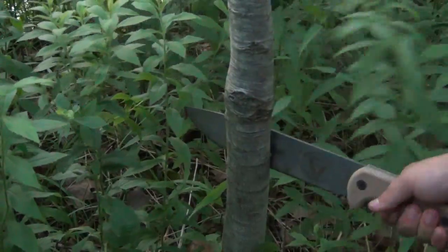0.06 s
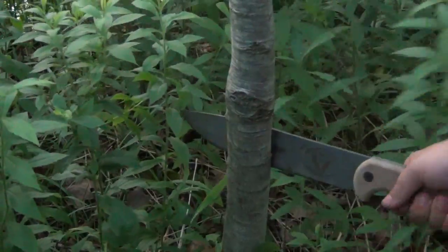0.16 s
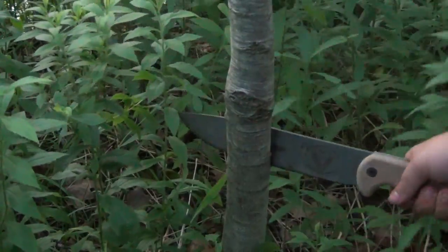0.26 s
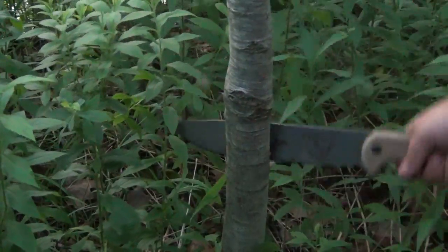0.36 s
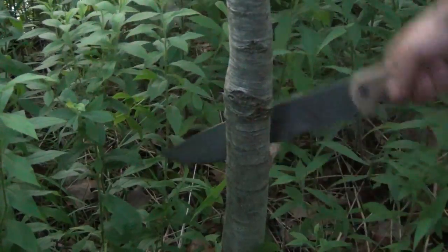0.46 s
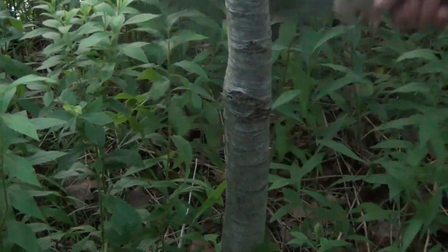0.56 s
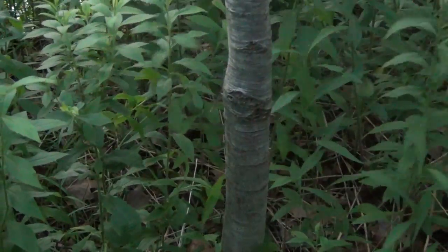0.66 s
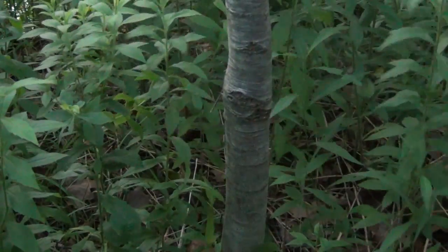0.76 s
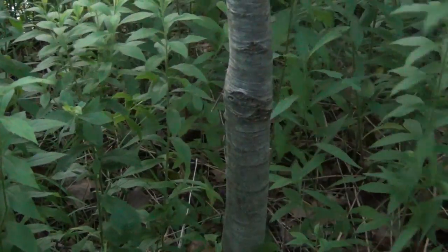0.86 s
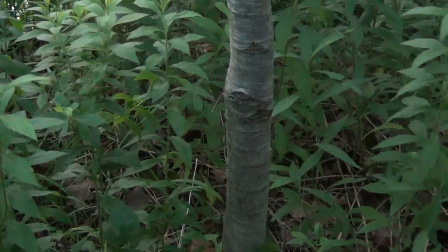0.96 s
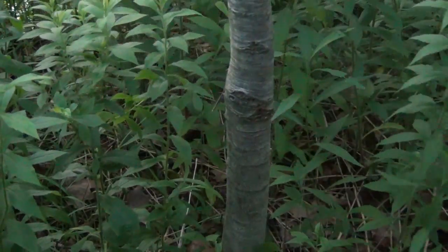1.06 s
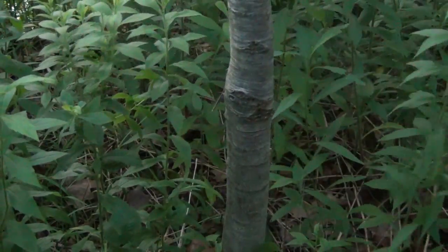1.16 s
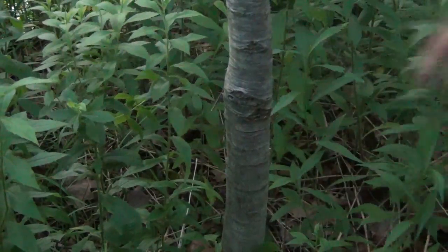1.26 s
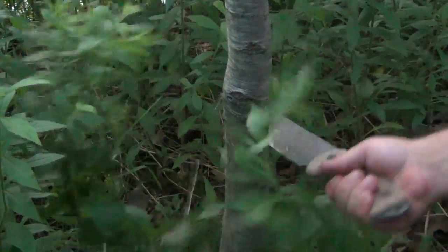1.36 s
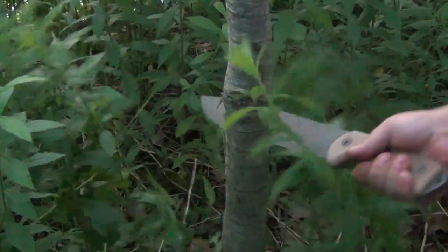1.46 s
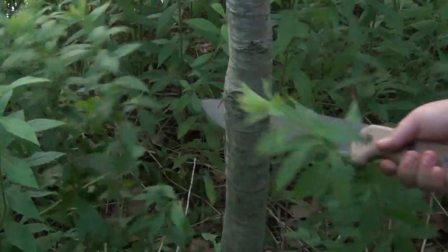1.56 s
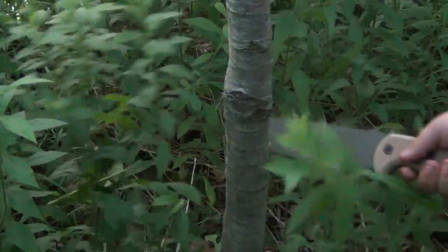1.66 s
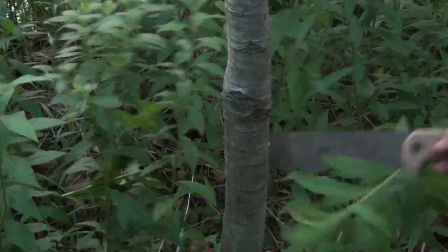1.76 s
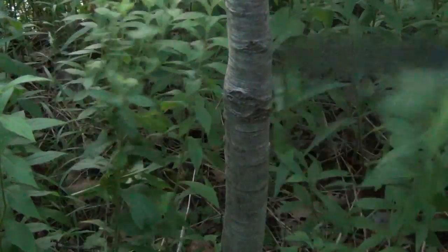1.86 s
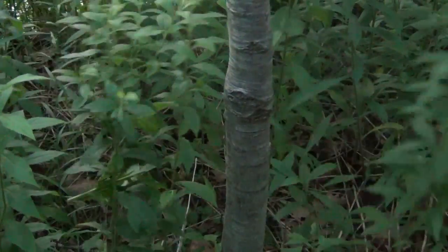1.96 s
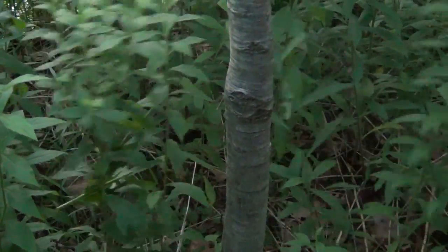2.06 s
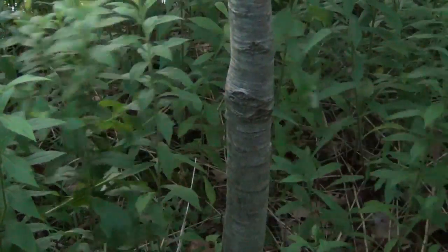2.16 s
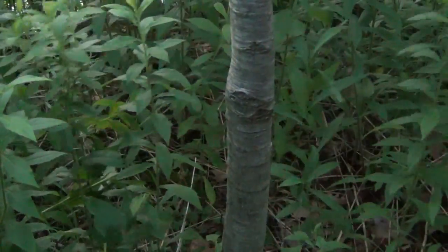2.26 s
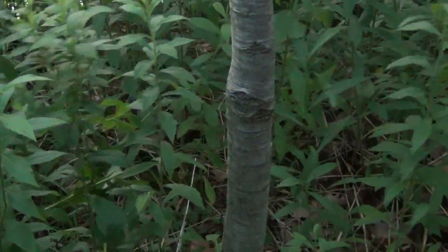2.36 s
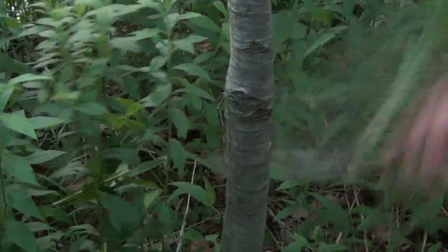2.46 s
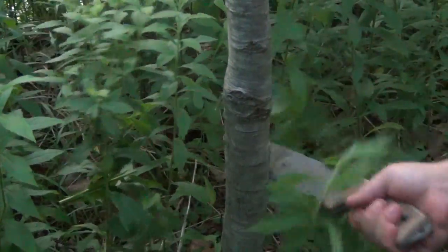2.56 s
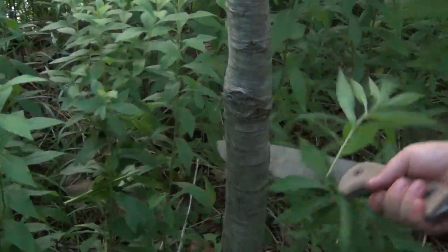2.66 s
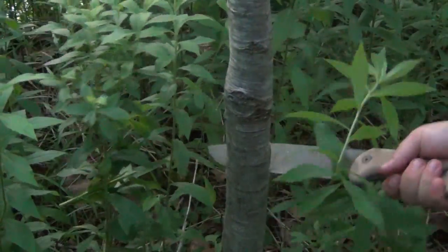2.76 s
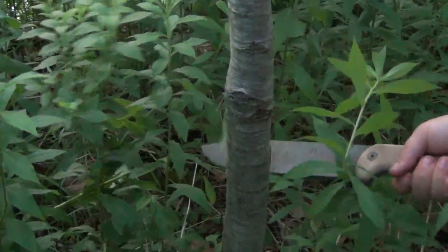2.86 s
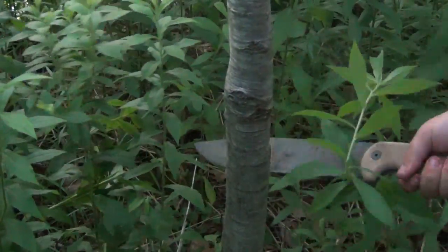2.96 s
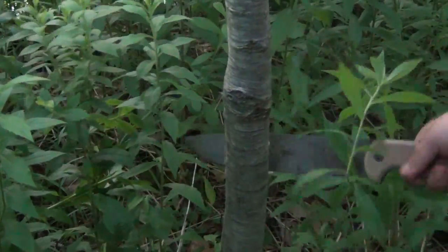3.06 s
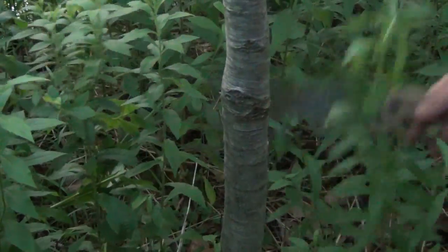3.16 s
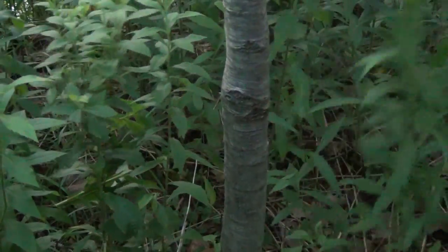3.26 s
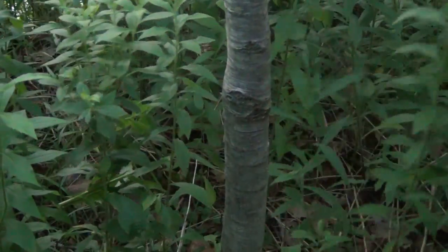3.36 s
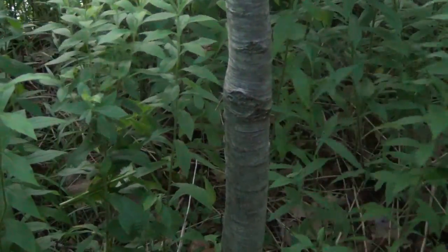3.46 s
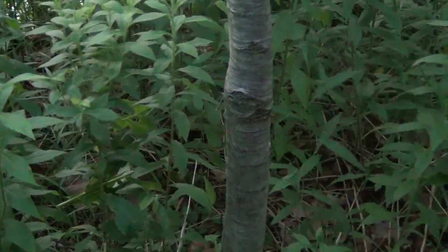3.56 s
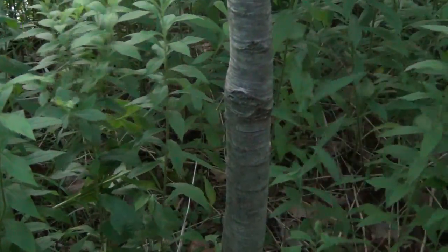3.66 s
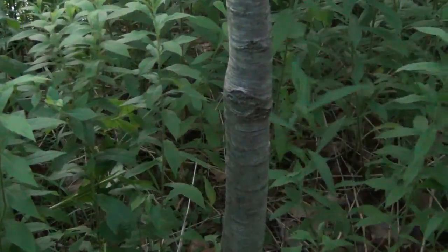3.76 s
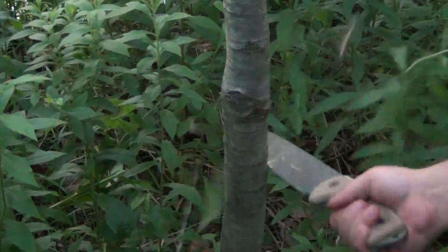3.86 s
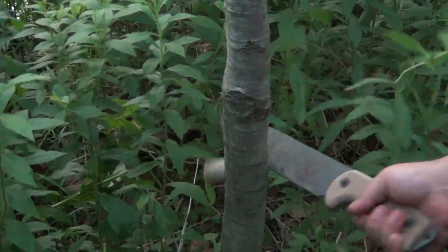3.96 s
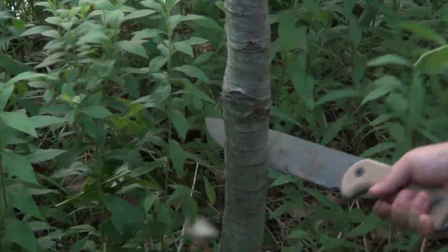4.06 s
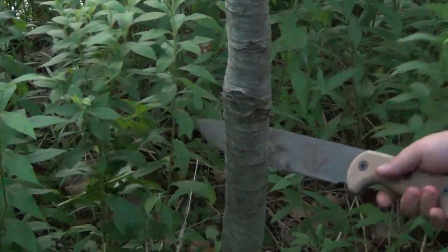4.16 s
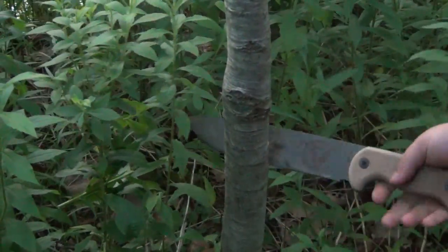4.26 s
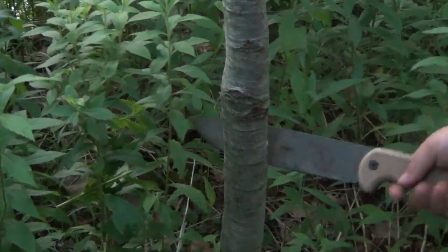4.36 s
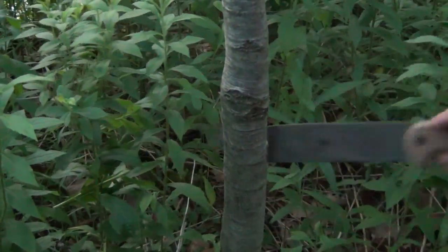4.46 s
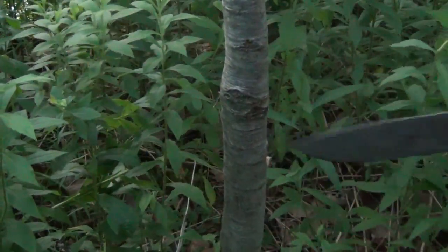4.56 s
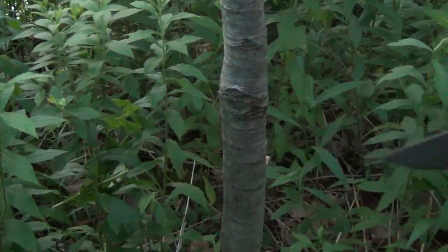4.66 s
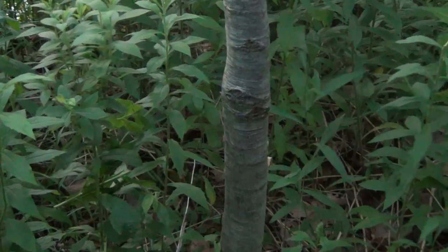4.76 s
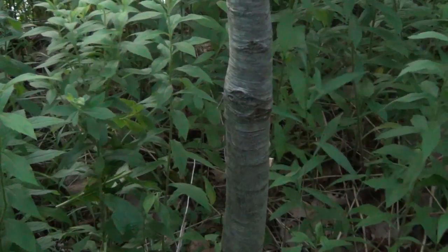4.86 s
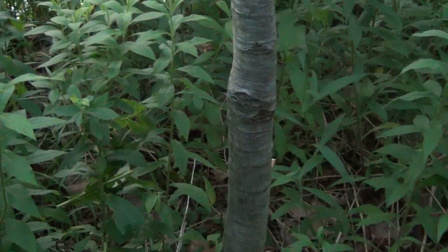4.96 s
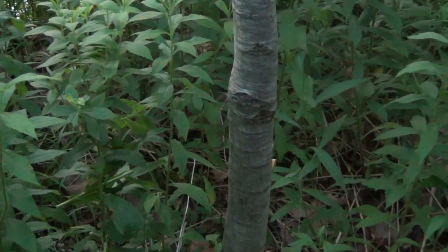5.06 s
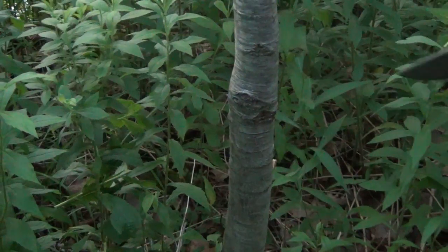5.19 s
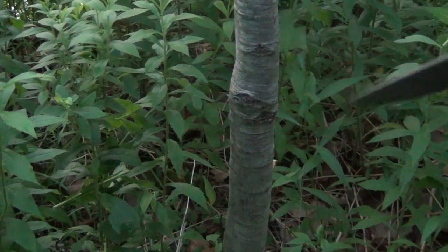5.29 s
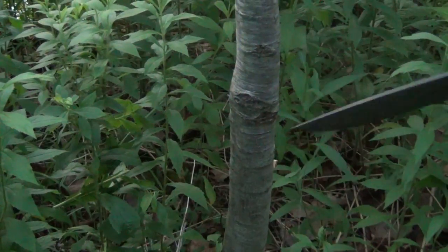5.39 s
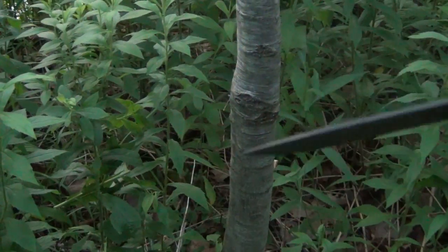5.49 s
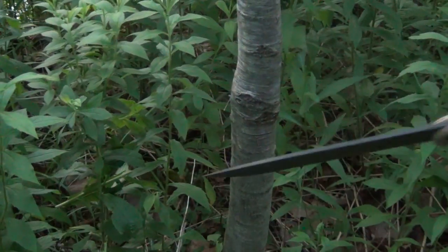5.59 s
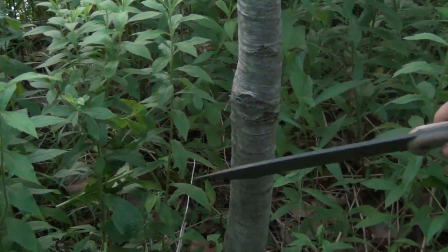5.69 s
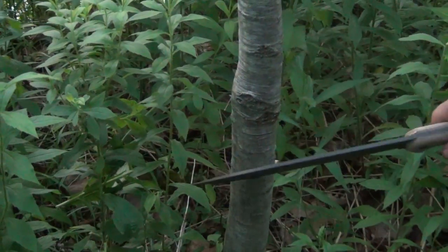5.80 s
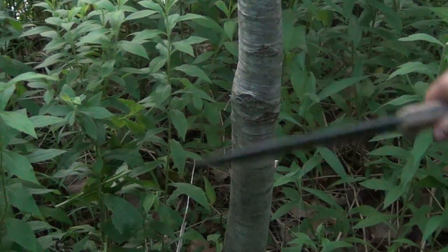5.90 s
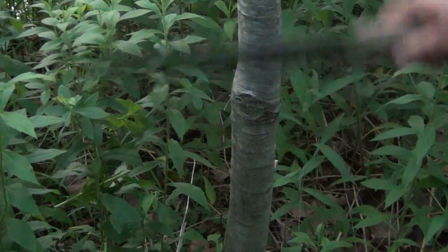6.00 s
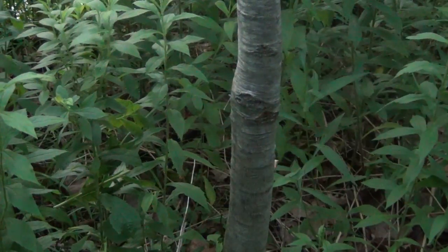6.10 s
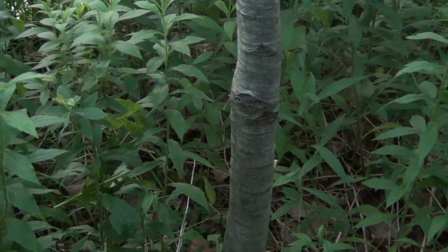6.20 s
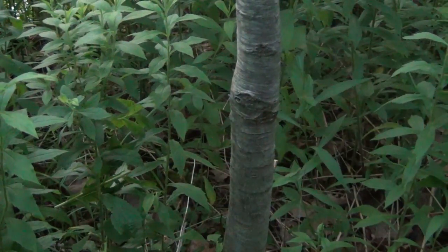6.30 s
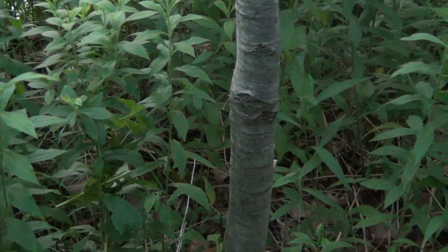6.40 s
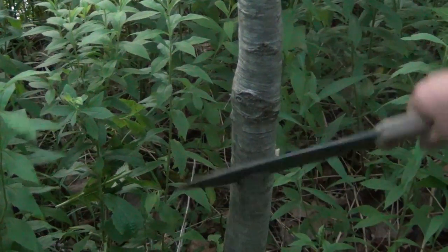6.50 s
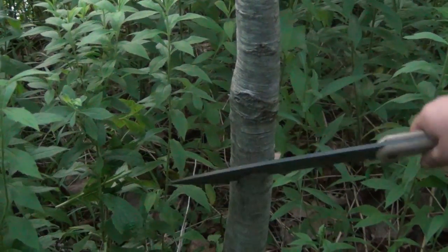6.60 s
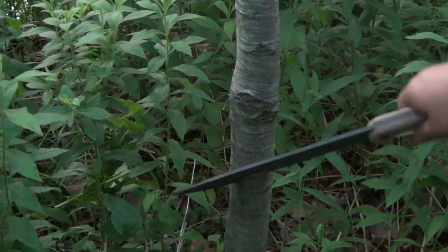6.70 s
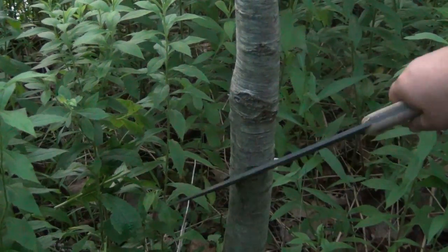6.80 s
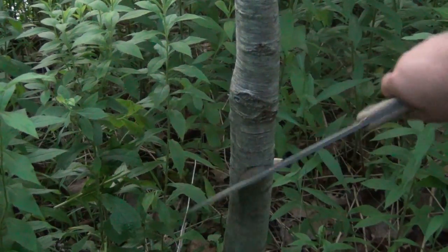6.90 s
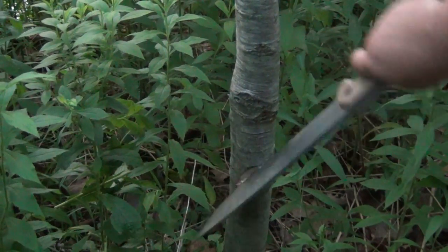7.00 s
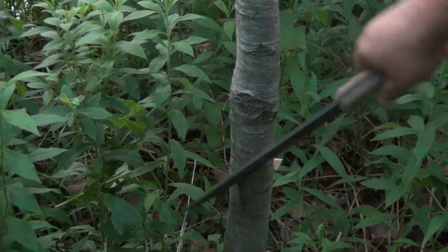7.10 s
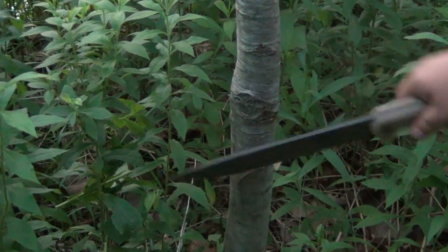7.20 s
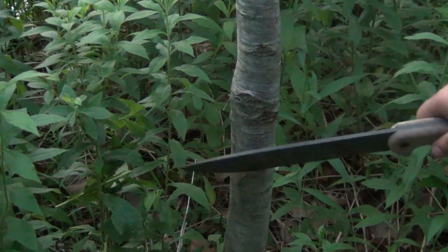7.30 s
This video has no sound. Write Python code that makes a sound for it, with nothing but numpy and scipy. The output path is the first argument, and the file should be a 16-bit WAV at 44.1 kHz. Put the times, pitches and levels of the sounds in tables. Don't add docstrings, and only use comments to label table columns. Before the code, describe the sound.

In leafy woodland, a long knife is worked loose from a thin trunk with crackling snaps and a brief steel ring. Three hard, spaced chops follow, each a woody knock with a low thud and a shower of leaves, then a light bite and another solid blow. Small birds whistle nearby and farther off over faint traffic hum. Close stereo camera microphone.

```python
import sys
import numpy as np
from scipy import signal
from scipy.fft import rfft, irfft, next_fast_len
from scipy.io import wavfile
from scipy.ndimage import uniform_filter1d, map_coordinates

SR = 44100
rng = np.random.default_rng(int(sys.argv[2]) if len(sys.argv) > 2 else 0)


def file_out(sig):
    cols = np.atleast_2d(sig).T
    lim = np.clip(cols, -1, 1)
    pcm = np.round(lim * 32767).astype(np.int16)
    wavfile.write(sys.argv[1], SR, pcm)


def volts_from_db(level):
    exponent = np.asarray(level, float) / 20
    return 10 ** exponent


N = 323694
CUT_RISE_S = 0.00082


def unit(x):
    return x / np.sqrt(np.mean(x ** 2) + 1e-20)


def along(points, hz):
    f, v = np.transpose(points)
    return np.interp(np.log(hz + 1), np.log(f + 1), v)


def filtered(x, response):
    m = next_fast_len(x.shape[-1] + 4096)
    spectrum = rfft(x, m) * response(np.fft.rfftfreq(m, 1 / SR))
    return irfft(spectrum, m)[..., :x.shape[-1]]


def peak(f, hz, width_hz):
    return 1j * f * width_hz / (hz * hz - f * f + 1j * f * width_hz)


def wobble(rate_hz, size):
    knots = rng.standard_normal(int(size * rate_hz / SR) + 4)
    return map_coordinates(knots, [np.arange(size) * rate_hz / SR])


def add(out, start_s, x):
    seat = out[..., round(start_s * SR):][..., :x.shape[-1]]
    seat += x[..., :seat.shape[-1]]


def pair(size, alike):
    turn = np.arccos(np.clip(alike, 0, 1)) / 2
    mid, side = rng.standard_normal((2, size)) * [[np.cos(turn)], [np.sin(turn)]]
    side = filtered(side, lambda f: peak(f, 4200, 11600) / (1 + (f / 14000) ** 4))
    return np.array([mid + side, mid - side])


def crackle(size, colour, grain_db, alike):
    # mode_hz, width_hz, lift_db
    steel = [(460, 440, -7), (1530, 170, -7), (2080, 100, -7), (2760, 55, -12), (4300, 130, -14),
             (5680, 55, -16), (6730, 110, -3), (7290, 100, 1), (8300, 200, -8), (10200, 150, -11)]
    jumps = volts_from_db(grain_db * (wobble(2500, size) + .6 * wobble(400, size)))
    bumps = rng.standard_normal(40)

    def response(f):
        ripple = volts_from_db(.6 * map_coordinates(bumps, [4 * np.log2(1 + f / 100)]))
        lift = 1 + sum(volts_from_db(db) * np.abs(peak(f, hz, width_hz)) ** 2 for hz, width_hz, db in steel)
        return colour(f) * ripple * lift

    return unit(filtered(jumps * pair(size, alike), response))


def rush(spectrum, patchy_db):
    # hz, left_right_likeness
    likeness = [(30, .6), (60, 0.95), (240, 0.92), (950, 0.881), (3770, 0.62), (15000, 0.57)]
    z = signal.stft(rng.standard_normal((2, N)), nperseg=512)[2]
    field = uniform_filter1d(rng.standard_normal(z.shape[1:]), size=6, axis=0)
    field = uniform_filter1d(field, size=12, axis=1)
    patchy = signal.istft(z * volts_from_db(patchy_db * unit(field)), nperseg=512)[1][:, :N]

    def response(f):
        turn = np.arccos(np.clip(along(likeness, f), -1, 1)) / 2
        return volts_from_db(along(spectrum, f)) * [np.cos(turn), np.sin(turn)]

    mid, side = filtered(patchy, response)
    return unit(np.array([mid + side, mid - side]))


def trees(x):
    # hz, t60_s
    wood = [(500, 0.15), (3000, 0.23), (6000, 0.31), (12000, 0.38)]
    hz, t, z = signal.stft(rng.standard_normal((2, SR // 2)), SR, nperseg=256)
    tail = signal.istft(z * volts_from_db(-60 * t / along(wood, hz)[:, None]), SR, nperseg=256)[1]
    tail = tail / np.linalg.norm(tail[0])
    return signal.fftconvolve(np.pad(x, (300, 0))[None], tail, axes=1)[:, :N]


def background():
    # hz, db_per_hz
    hum = [(12, -41), (20, -19), (42, -1.5), (64, -28), (83, -2.5), (102, 3.5), (129, -1), (225, -3.5),
           (255, -10), (289, -10.5), (400, -20.5), (520, -57), (880, -120)]
    # hz, db_per_hz
    roar = [(180, -41), (300, -14), (328, -13), (455, -5), (573, -6.5), (649, -6.5), (768, -4), (951, -4),
            (1180, -1), (1490, -8), (1690, -10), (1820, -10.5), (2210, -14), (2500, -19.5), (3250, -38),
            (5500, -120)]
    # hz, db_per_hz
    foliage = [(900, -32), (1800, -5), (3000, 2), (5000, -2.5), (8000, -12), (12000, -68)]
    # hz, db_per_hz
    hiss = [(3000, -58), (6000, 3.5), (11000, 0.5), (15500, -5.5), (16500, -25)]
    # time_s, roar_db
    road_curve = [(0, -47.5), (.9, -46), (1.7, -49), (3, -50), (3.85, -45.5), (4.6, -44), (5.5, -42.5),
                  (5.95, -45), (7.34, -46.5)]
    # time_s, level_db
    stir_curve = [(0, -44.5), (.4, -53), (.9, -53.5), (1.3, -57), (1.7, -49), (2.1, -56), (2.5, -57),
                  (3, -50.5), (3.45, -51.5), (3.85, -54), (4.2, -50.5), (4.6, -51), (5, -47), (5.5, -45),
                  (5.95, -53), (6.4, -56.5), (6.8, -46.5), (7.34, -57.5)]
    t = np.arange(N) / SR
    road_db = np.interp(t, *np.transpose(road_curve))
    stir_db = np.interp(t, *np.transpose(stir_curve))
    hum_db = -54.5 + 0.086 * (road_db - road_db.mean()) + 0.87 * t
    hiss_db = -7 + stir_db.mean() + 0.78 * (stir_db - stir_db.mean())
    traffic = volts_from_db(hum_db) * rush(hum, patchy_db=1.9) + volts_from_db(road_db) * rush(roar, patchy_db=1.5)
    leaves = volts_from_db(stir_db - 0.1) * rush(foliage, patchy_db=2.5)
    return traffic + leaves + volts_from_db(hiss_db) * rush(hiss, patchy_db=1.6)


def strokes():
    # start_s, hold_s, t60_s,
    # level_db, brightest_hz
    cut_rows = [(0, 0.0065, 0.31, -33.5, 3700), (.588, 0.054, 0.15, -33.5, 5800),
                (1.375, 0.0022, 0.015, -28, 2000), (1.377, 0.035, 0.02, -19, 6200),
                (1.383, 0.0037, 0.022, -20.5, 7000), (1.545, 0.016, 0.13, -30, 6950),
                (2.572, 0.0034, .028, -15.5, 2760), (2.577, 0.016, 0.055, -20.5, 6370),
                (2.899, 0.00949, 0.077, -47, 8000), (3.226, 0.0067, 0.096, -35.5, 5950),
                (3.886, 0.023, .02, -43.5, 2500), (3.918, 0.021, .03, -30.5, 5215),
                (3.9302, 0.002, 0.039, -13, 4400), (3.938, 0.04, 0.13, -22, 3570),
                (4.298, 0.0055, 0.18, -38, 6060), (5.829, 0.0052, 0.047, -29.5, 7000),
                (6.5916, 0.0014, 0.01, -10.5, 3400), (6.598, 0.0074, 0.37, -29, 3320),
                (0, 0.014, 0.36, -35.5, 160), (1.388, 0.019, 0.041, -22.5, 450),
                (2.579, 0.014, .02, -20.5, 480), (3.907, 0.0089, 0.033, -28, 650)]
    # start_s, stroke_s, level_db, brightest_hz
    rustle_rows = [(0.118, 0.038, -45, 7840), (.956, 0.037, -48, 3520), (1.296, 0.035, -46, 3670),
                   (1.7, 0.034, -49.5, 4300), (1.827, 0.062, -50.5, 4340), (2.163, .03, -52.5, 9000),
                   (2.72, 0.12, -48.5, 5740), (3.365, 0.028, -44, 9000), (4.34, 0.038, -36, 5440),
                   (4.455, 0.075, -47, 9000), (4.631, 0.0468, -43.5, 4640), (5.196, 0.2, -43.5, 2460),
                   (5.768, 0.11, -34, 2290), (6.84, 0.027, -65, 4500), (7, 0.059, -50, 4040)]
    # start_s, stroke_s, level_db, brightest_hz
    scrape_rows = [
        (.455, 0.12, -37, 7500),
        (3.1, 0.061, -42, 7650),
        (3.9031, 0.0162, -22, 4630),
        (7.061, 0.071, -37, 9000),
    ]
    rows = [(s, CUT_RISE_S, hold_s, t60_s, db, hz) for s, hold_s, t60_s, db, hz in cut_rows]
    for s, d, db, hz in rustle_rows:
        rows.append((s, 0.22 * d, (1 - 0.22) * d, 0.033 + 1.96 * d, db, hz))
    for s, d, db, hz in scrape_rows:
        rows.append((s, 0.18 * d, (1 - 0.18) * d, 0.4 * d, db, hz))
    return rows


def brushing():
    # hz, db_per_hz
    leaf = [(120, -10), (200, 6), (448, 3.5), (1530, 8), (2130, 6), (2510, 6), (7410, -1.5), (11500, -0.5),
            (14600, -11), (16000, -58)]
    out = np.zeros((2, N))
    for s, rise_s, hold_s, t60_s, db, hz in strokes():
        t = np.arange(SR // 2 if hold_s + t60_s > .15 else SR // 5) / SR
        stroke = np.minimum(t / rise_s, 1) * volts_from_db(-60 * np.maximum(t - rise_s - hold_s, 0) / t60_s)

        def colour(f):
            leaf_db = along(leaf, f)
            return volts_from_db(leaf_db - 8) + volts_from_db(.4 * leaf_db - 8 * np.log2((f + 50) / hz) ** 2)

        add(out, s, volts_from_db(db) * stroke * crackle(len(t), colour, grain_db=2.5, alike=0.69))
    return out


def ticks():
    # start_s, peak_db
    slips = [(.123, -33), (0.2954, -37), (0.35, -32.5), (0.3656, -41), (.401, -31), (0.452, -23),
             (0.515, -21.5), (.2453, -36), (.3092, -45), (.3292, -41), (0.382, -39), (0.4976, -29),
             (.508, -31), (.523, -26), (.528, -23.5), (.535, -22), (.557, -32), (0.567, -32), (0.583, -36),
             (0.593, -25), (.633, -33), (3.2347, -29), (3.3036, -38), (3.094, -36), (3.1218, -27),
             (3.1257, -27), (3.138, -23.5), (3.181, -37), (4.226, -42), (4.232, -49), (4.303, -26),
             (0.679, -39), (3.079, -35), (3.108, -29.5), (3.3745, -38), (4.1996, -28.5), (4.3418, -26),
             (.143, -36), (.253, -41), (.291, -44), (0.345, -41), (1.767, -38), (6.71, -34), (1.834, -42),
             (7.163, -42), (3.21, -37), (3.402, -42), (4.66, -44), (4.98, -40), (5.026, -42),
             (5.207, -37.5), (5.742, -41), (5.8425, -33), (5.924, -42), (5.933, -45), (5.762, -31),
             (6.965, -38), (7.011, -29), (7.196, -38.5)]
    luck = np.exp(0.16 * np.clip(rng.standard_normal((len(slips), 2)), -2, 2))
    return [(s, db, 3300 * low, 7600 * high, -4.5) for (s, db), (low, high) in zip(slips, luck)]


def snaps():
    # start_s, peak_db, low_hz, high_hz, low_over_high_db
    fibres = [(0.4253, -10.5, 3000, 6700, 1.5), (0.467, -24.5, 3000, 8100, -11),
              (0.4802, -20, 2900, 9100, -5), (0.539, -18.5, 1940, 7740, 4),
              (0.5435, -13.5, 2810, 6860, -3.5), (0.589, -18, 3113, 6540, 8), (0.6023, -14, 2580, 7290, 11),
              (0.606, -8, 3020, 10300, 5), (1.547, -18.5, 2600, 11500, -4), (1.8574, -34, 3020, 9000, 12),
              (2.081, -28, 3450, 6700, -12), (2.934, -24, 1800, 8300, 21), (3.119, -24, 4470, 6960, 1),
              (3.1294, -20, 3880, 8390, -4), (3.141, -21, 3700, 6960, 0), (3.149, -23, 4300, 11400, -12),
              (3.227, -22, 2480, 7440, 12), (4.365, -24, 1510, 8100, 0), (4.297, -31, 2500, 7100, 5),
              (4.474, -33.5, 2540, 7940, 5), (5.8229, -16.5, 1750, 6900, 1), (6.59, -9, 3530, 11500, 2),
              (6.905, -19.5, 1780, 11500, -18), (7.051, -27, 3920, 8000, -18),
              (7.067, -24, 3370, 9000, -27), (7.09, -27, 4470, 5720, -7), (7.1113, -19, 3420, 8340, -28)]
    lag_s = .0014
    out, t = np.zeros((2, N)), np.arange(SR // 20) / SR
    for s, db, low_hz, high_hz, low_db in fibres + ticks():
        decay = volts_from_db(-60 * t / .005) + .2 * volts_from_db(-60 * t / .025)
        spike = pair(len(t), alike=.85) * decay + 2 * (t == 0)

        def response(f):
            low = peak(f, low_hz, 960) ** 2 + 0.36 * peak(f, 3100, 3600)
            high = peak(f, high_hz, 1500) ** 2 + 0.24 * peak(f, 6930, 3000) ** 2
            high = high + 0.82 * peak(f, 10850, 1400) ** 2 + 0.16 * peak(f, 4800, 10400) ** 2
            return volts_from_db(low_db) * low + high / (1 + (f / 12000) ** 4)

        snap = filtered(spike, response)
        add(out, s + lag_s, volts_from_db(db + 4.5) * snap / np.abs(snap.mean(0)).max())
    return out


def rattles():
    # start_s, hold_s, t60_s, level_db, mode_hz
    rows = [(0.598, .014, 0.026, -26, 3070), (1.382, .008, .03, -26, 7240), (1.383, .008, .025, -22, 5500),
            (2.572, 0.0029, 0.024, -14.5, 2730), (2.573, .005, 0.028, -21, 6870),
            (3.908, 0.0069, .03, -30, 1530), (5.8245, .004, .02, -29, 6000),
            (6.59, 0.0019, 0.012, -13.5, 3460), (6.602, 0.014, 0.22, -29.5, 3550),
            (6.605, 0.013, 0.046, -32, 2740), (0.425, 0.0038, 0.024, -28, 1710),
            (.968, 0.011, .03, -48, 4100), (1.517, .004, .015, -40, 2010), (1.829, 0.063, .03, -48.5, 4420),
            (2.081, .01, 0.091, -39.5, 6700), (2.721, 0.0028, .015, -35, 1560),
            (1.416, .003, .015, -18, 2170), (3.952, 0.046, .08, -31, 3250),
            (3.957, 0.0096, 0.036, -26.5, 2130), (4.056, .004, .015, -39, 1700),
            (4.087, .004, .015, -38.5, 4960), (4.382, .008, .03, -49, 11100),
            (4.565, 0.061, .03, -52.5, 6600), (4.595, 0.024, .02, -50, 7300)]
    out = np.zeros((2, N))
    for s, hold_s, t60_s, db, hz in rows:
        t = np.arange(SR // 4 if hold_s + t60_s > .08 else SR // 10) / SR
        stroke = np.minimum(t / CUT_RISE_S, 1) * volts_from_db(-60 * np.maximum(t - hold_s, 0) / t60_s)
        grains = crackle(len(t), lambda f: peak(f, hz, 460) ** 2, grain_db=0.5, alike=0.86)
        add(out, s, volts_from_db(db) * stroke * grains)
    return out


def blade():
    # start_s, ring_time_share, free_s, ring_db, jolt_db
    touches = [
        (0.4817, .85, .1, -60, -30),
        (0.609, 0.39, 0.022, -39, -20),
        (0.624, 0.4, .3, -22.5, -49),
        (2.081, 4.3, 0.15, -42.5, -44),
        (2.171, 0.6, .03, -60, -45),
        (3.23, 0.99, .05, -58.5, -32),
        (4.375, .6, .06, -49, -52),
        (4.56, 0.45, 0.031, -52, -49),
        (4.597, 0.63, .02, -58, -41.5),
        (5.827, 0.37, .02, -51.5, -30),
    ]
    # mode_hz, t60_s
    free_modes = [(3413, 0.6), (5922, 1), (14510, 0.19)]
    # mode_hz, level_db, t60_s
    gripped_modes = [(2595, -1.5, 0.1), (4390, -0.5, 0.058), (6700, -5, 0.036), (7240, -6, 0.12),
                     (9000, -5, 0.072), (9940, -8, 0.051), (11500, -11, .06)]
    # time_s, width_s, gain_db
    main_nulls = [(.663, 0.0055, -12), (.712, 0.0059, -9), (.743, 0.0046, -24), (.779, 0.005, -23),
                  (0.851, 0.017, 2), (2.105, 0.0059, -7)]
    # time_s, width_s, gain_db
    low_nulls = [(.635, 0.0061, -23), (2.152, 0.013, -18), (2.225, 0.01, -4)]
    out, t = np.zeros(N), np.arange(SR) / SR

    def ring(hz, db, t60_s):
        return volts_from_db(db - 60 * t / t60_s) * (1 - np.exp(-t / 0.00083)) * np.sin(2 * np.pi * hz * t)

    def turned_db(s, nulls):
        return sum(db * np.exp(-((s + t - at_s) / width_s) ** 2 / 2) for at_s, width_s, db in nulls)

    for s, share, free_s, main_db, jolt_db in touches:
        short = min(share, 1)
        low_db = main_db - 6 + turned_db(s, low_nulls)
        mid_db = main_db + turned_db(s, main_nulls)
        high_db = -43 + 1.2 * (jolt_db + 33)
        swing = volts_from_db(-60 * np.maximum(t - free_s, 0) / 0.12)
        free = zip(free_modes, (low_db, mid_db, high_db), (short, share, short))
        add(out, s, swing * sum(ring(hz, db, t60_s * life) for (hz, t60_s), db, life in free))
        gripped = zip(gripped_modes, rng.normal(0, 2, len(gripped_modes)))
        add(out, s, sum(ring(hz, jolt_db + db + luck_db, t60_s * short)
                        for (hz, db, t60_s), luck_db in gripped))
    return out


def blows():
    # start_s, knock_db, knock_hz, thump_db, shower_db
    bites = [
        (.6045, -28, 920, -46, -62),
        (1.417, -4, 1460, -18.5, -17),
        (2.6007, -0.5, 1684, -18.5, -16.5),
        (3.932, -3, 1674, -16, -16.5),
        (5.8265, -20, 1730, -57, -44),
        (5.8305, -25, 920, -43, -60),
        (6.5948, -4, 1710, -23.5, -24),
    ]
    # share_of_knock_hz, width_hz, level_db
    trunk = [(.27, 150, -4), (.68, 250, 1.5), (1, 85, 12), (1.35, 307, 2), (1.02, 450, -5), (2, 600, -2)]
    # mode_hz, arrival_s, sharpness, level_db
    stem = [(106.7, 0.035, 8.6, 0.5), (167.4, 0.017, 6.7, 1), (250, 0.032, 11, -8.5),
            (314.6, 0.013, 3.6, -2.5), (360, 0.013, 1.8, -28), (105.5, 0.079, 5.7, -19.5)]
    # hz, db_per_hz
    shower_spectrum = [(150, -1), (250, -8), (444, -11), (723, -9), (802, -7.5), (1910, -6.5), (2090, -6),
                       (5160, -13), (7190, -15.5), (16000, -25.5)]
    out, t = np.zeros((2, N)), np.arange(SR // 2) / SR
    size = len(t)

    def swell(late_s, sharp):
        return (t / late_s * np.exp(1 - t / late_s)) ** sharp * volts_from_db(wobble(36, size))

    def bend(hz):
        return np.sin(2 * np.pi * hz * t + 0.33 * wobble(39, size))

    def fade(t60_s):
        stirring = 0.075 * volts_from_db(-60 * t / (4 * t60_s))
        return (volts_from_db(-60 * t / t60_s) + stirring) * np.minimum(t / 0.011, 1)

    for s, knock_db, knock_hz, thump_db, shower_db in bites:
        second_hit = np.arange(size) == round(.0018 * SR)
        force = (t == 0) + 1.2 * second_hit + .05 * volts_from_db(-60 * t / .03) * rng.standard_normal(size)

        def wood_response(f):
            modes = sum((-1) ** k * volts_from_db(db) * peak(f, share * knock_hz, width_hz)
                        for k, (share, width_hz, db) in enumerate(trunk))
            return modes / (1 + 1j * f / 2000) ** 2

        knock = filtered(force, wood_response)
        thud = sum(volts_from_db(db) * swell(late_s, sharp) * bend(hz) for hz, late_s, sharp, db in stem)
        thud = thud + 0.1 * np.array([[1], [-1]]) * wobble(36, size) * thud
        add(out, s, volts_from_db(knock_db) * knock / np.abs(knock).max() + volts_from_db(thump_db - 5.5) * thud)

        shower = crackle(size, lambda f: volts_from_db(along(shower_spectrum, f)), grain_db=2.0, alike=0.61)
        dull = filtered(shower, lambda f: 1 / (1 + (f / 3500) ** 2))
        t60_s = 0.34
        add(out, s, volts_from_db(shower_db) * (dull * fade(t60_s * 0.82) + (shower - dull) * fade(t60_s)))
    return out


def whistle(notes, trill_hz, depth, overtone_db):
    out = np.zeros(N)
    for note in notes:
        s, hz, db = np.transpose(note)
        t = np.arange(s[0], s[-1], 1 / SR)
        level_db = np.interp(t, s, db)
        flutter = np.sin(2 * np.pi * trill_hz * t + 1.3 * wobble(49.0, len(t)))
        flutter = flutter + .5 * wobble(312, len(t))
        phase = 2 * np.pi * np.cumsum(np.interp(t, s, hz) * (1 + depth * flutter)) / SR
        edge = np.clip(np.minimum(t - s[0], s[-1] - t) / 0.015, 0, 1)
        octave_db = overtone_db + 2 * (level_db - db.max()) + 3.1 * wobble(245, len(t))
        voice = np.sin(phase) + volts_from_db(octave_db) * np.sin(2 * phase)
        add(out, s[0], np.sqrt(2) * volts_from_db(level_db) * edge * voice)
    return out


def near_bird():
    # start_s, start_hz, top_hz, length_s, level_db
    buzz = [
        (0.874, 5300, 6570, 0.052, -33),
        (2.509, 5400, 6500, 0.047, -29.5),
        (4.691, 5400, 6500, 0.0484, -30.5),
        (6.214, 5100, 6650, 0.048, -29.5),
    ]
    # start_s, start_hz, top_hz, length_s, level_db
    upper = [
        (.878, 6500, 7970, 0.048, -32.5),
        (2.525, 8000, 8700, 0.046, -47),
        (4.705, 7800, 8800, .04, -44),
        (6.232, 7600, 9000, 0.049, -49),
    ]
    # start_s, pitch_hz, level_db
    slurs = [
        (0.93, 6300, -28.5),
        (4.743, 6130, -28),
        (6.279, 6100, -27.5),
    ]
    # after_s, share_of_pitch, level_db
    slur_shape = [(0, .985, 5), (.015, 0.98, -1), (0.029, .995, 1.5), (0.047, 0.94, -2), (.06, .9, -5.5),
                  (.08, .81, -13)]

    def rises(rows):
        return [[(s, low_hz, db + 0.5), (s + 0.43 * d, top_hz * 0.97, db), (s + d, top_hz * .95, db - 20)]
                for s, low_hz, top_hz, d, db in rows]

    falls = [[(s + after_s, hz * share, db + shape_db) for after_s, share, shape_db in slur_shape]
             for s, hz, db in slurs]
    call = whistle(rises(buzz), trill_hz=260, depth=.07, overtone_db=-14)
    call = call + whistle(falls, trill_hz=60, depth=.007, overtone_db=-21)
    return call + whistle(rises(upper), trill_hz=300, depth=.045, overtone_db=-21)


def far_singer():
    # start_s, length_s, top_hz, end_hz, level_db
    arch_rows = [
        (3.645, 0.03, 2240, 2080, -50),
        (5.625, .082, 2600, 2070, -51),
        (6.81, 0.078, 2830, 2040, -48),
        (6.906, 0.085, 2460, 2035, -50),
    ]
    # share_of_length, share_of_drop, level_db
    arch_shape = [(0, 0.775, -5), (.25, 0.94, 2), (.52, 0.9, -2), (.78, 0.37, -1), (.88, .1, 7),
                  (1, 0.12, 3)]
    # start_s, length_s, start_hz, end_hz, level_db
    glide_rows = [
        (2.115, .065, 4550, 3450, -57),
        (3.76, 0.095, 4400, 3150, -51),
        (6.238, 0.07, 3200, 3235, -49),
        (6.972, .035, 4050, 4055, -51),
        (6.995, .06, 2750, 3230, -49),
        (7.05, .1, 5680, 5850, -48),
        (7.18, 0.07, 3750, 4350, -52),
    ]
    # time_s, pitch_hz, level_db
    steps = [
        [(6.165, 2850, -52), (6.188, 2950, -46), (6.2, 2560, -44), (6.25, 2500, -47), (6.265, 2500, -54),
         (6.278, 2530, -46), (6.293, 2510, -50)],
        [(6.294, 2560, -50), (6.312, 2160, -43), (6.33, 2030, -45), (6.372, 2050, -49), (6.425, 2000, -56)],
    ]
    arches = [[(s + part * d, end_hz + share * (top_hz - end_hz), db + shape_db)
               for part, share, shape_db in arch_shape] for s, d, top_hz, end_hz, db in arch_rows]
    glides = [[(s, a_hz, db), (s + d / 2, a_hz + 0.68 * (b_hz - a_hz), db - 3), (s + d, b_hz, db - 6)]
              for s, d, a_hz, b_hz, db in glide_rows]
    return whistle(arches + glides + steps, trill_hz=30, depth=.012, overtone_db=-35)


def second_bird():
    # start_s, pitch_hz, climb_hz, level_db
    chirp_rows = [
        (5.086, 5740, 298, -39),
        (5.19, 5050, 478, -29),
        (5.305, 4950, 340, -28.5),
        (5.41, 4950, 302, -46),
        (7.139, 5020, 395, -31),
        (7.274, 4880, 350, -27.5),
    ]
    # after_s, share_of_climb, level_db
    chirp_shape = [(0, 0.016, -5), (0.028, 0.048, -7.5), (0.049, 0.614, -9.5), (.075, 1, -11),
                   (0.104, 0.95, -6)]
    chirps = [[(s + after_s, hz + share * climb_hz, db + shape_db) for after_s, share, shape_db in chirp_shape]
              for s, hz, climb_hz, db in chirp_rows]
    return whistle(chirps, trill_hz=75, depth=.014, overtone_db=-26)


def birds():
    near, far, second = near_bird(), far_singer(), second_bird()
    direct = near * volts_from_db([[-4.2], [-4.1]]) + second * volts_from_db([[-6.3], [-2.4]]) + far * volts_from_db([[.1], [-.1]])
    return direct + trees(volts_from_db(-3) * near + volts_from_db(0.4) * second + volts_from_db(-7) * far)


def scene():
    # time_s, left_over_right_db
    place = [(0, -1.5), (.7, -2), (1.5, -1), (2.7, -.8), (4.2, 0), (5.2, -9), (5.8, -6), (6.4, -0.5),
             (7.34, .2)]
    pan = volts_from_db(np.interp(np.arange(N) / SR, *np.transpose(place)) * [[.5], [-.5]])
    knife = brushing() + snaps() + rattles() + blade() + blows()
    knife = pan * filtered(knife, lambda f: 1 / (1 + (84 / (f + 1)) ** 8))
    echo = volts_from_db(-19) * trees(knife.mean(0))
    return knife + echo + birds() + background()


def masked(x):
    # hz, level_db
    floor = [(9000, -32.5), (13000, -35), (16000, -38)]
    stft_set = dict(window="cosine", nperseg=2048, noverlap=1024)
    hz, _, z = signal.stft(np.pad(x, ((0, 0), (882, 0))), SR, **stft_set)
    bands = (np.abs(z.mean(0)[:-1]) ** 2).reshape(32, 32, -1).mean(1)
    loudest = (bands[8:-1] + bands[9:]).max(0)
    heard = bands > loudest * volts_from_db(2 * along(floor, hz[16::32, None]))
    keep = np.repeat(heard, 32, axis=0) | (hz[:-1, None] < 6800)
    z = z * np.pad(keep, ((0, 1), (0, 0)))
    return signal.istft(z, SR, **stft_set)[1][:, 882:882 + N]


def low_pass(x):
    return signal.sosfilt(signal.butter(12, 16620, fs=SR, output="sos"), x)


def record(dry):
    rounded = dry / (1 + np.abs(dry / .97) ** 6) ** (1 / 6)
    mix = masked(filtered(rounded, lambda f: 1 / (1 + (f / 15850) ** 60)))
    return low_pass(mix)


dry = scene()
out = record(dry)
file_out(out)
```